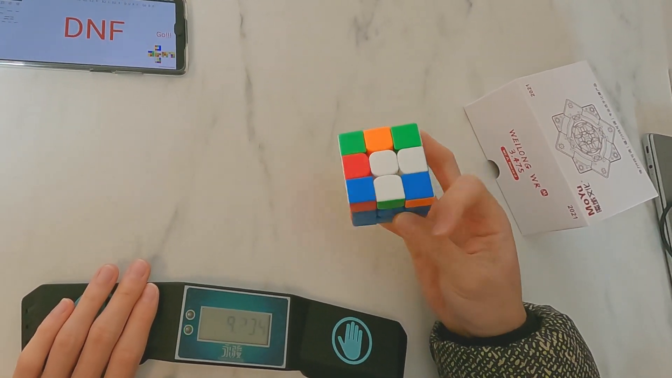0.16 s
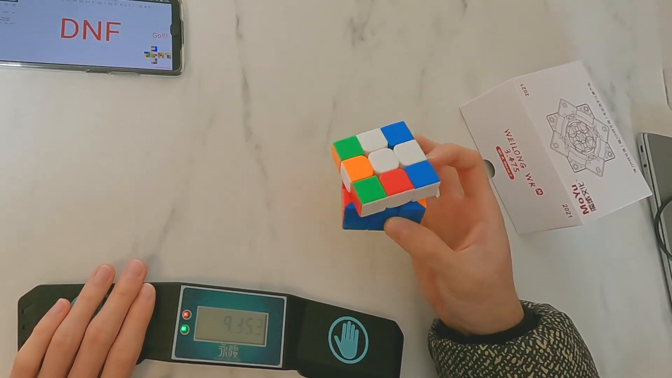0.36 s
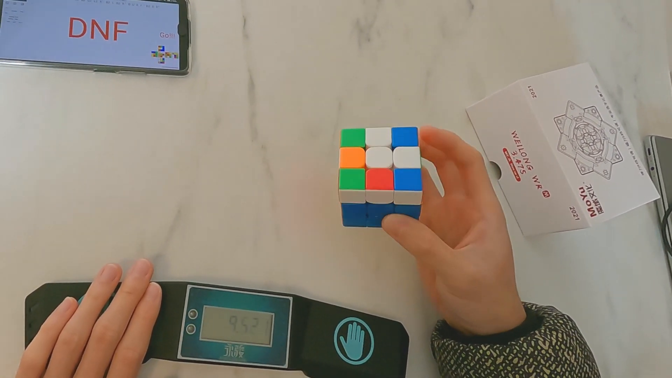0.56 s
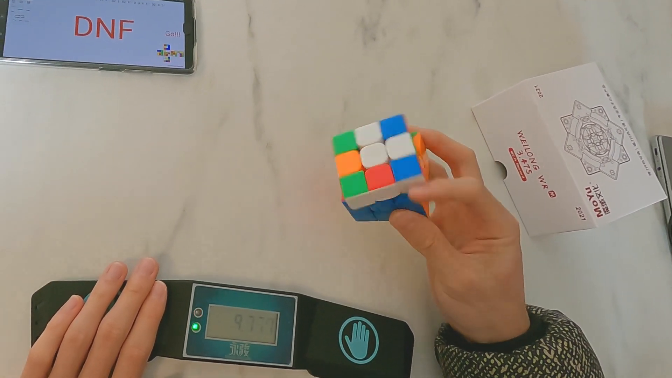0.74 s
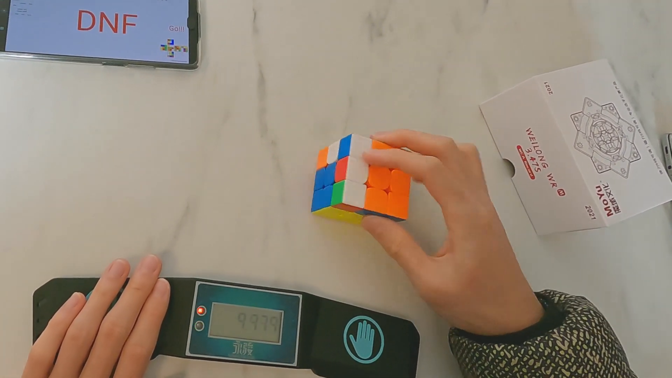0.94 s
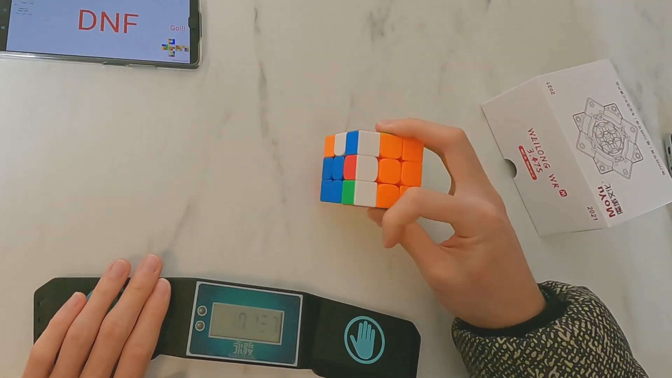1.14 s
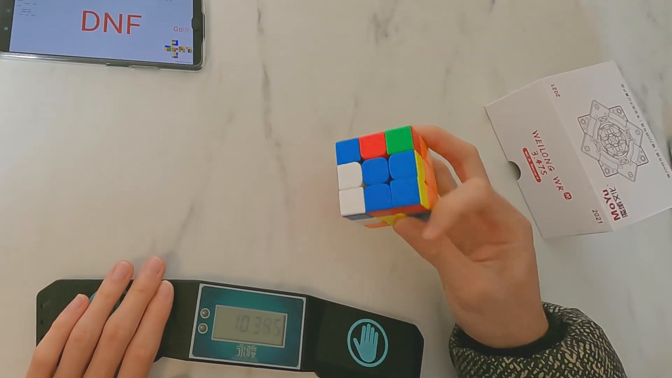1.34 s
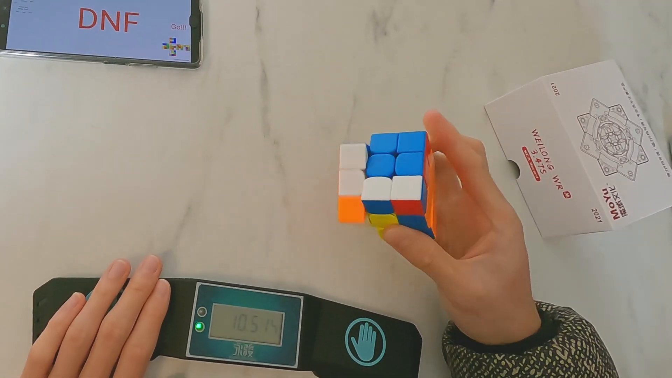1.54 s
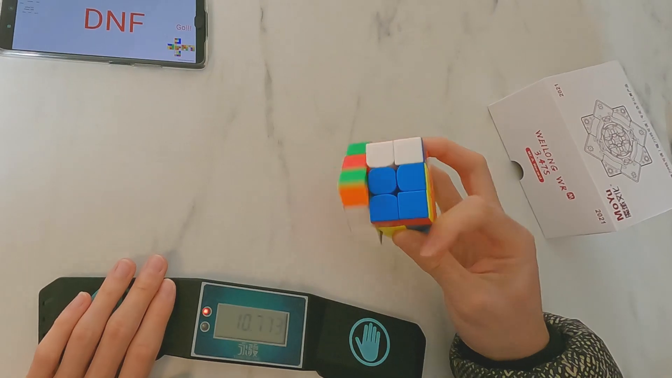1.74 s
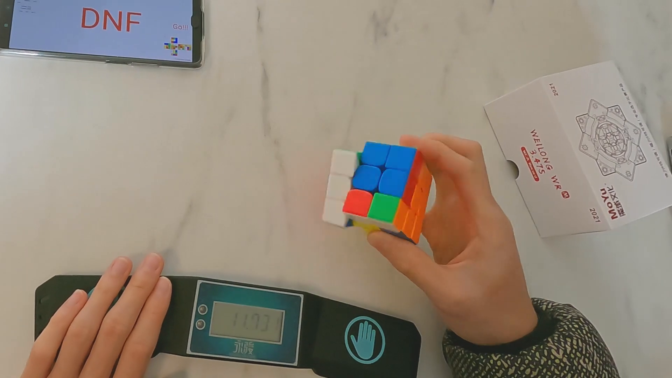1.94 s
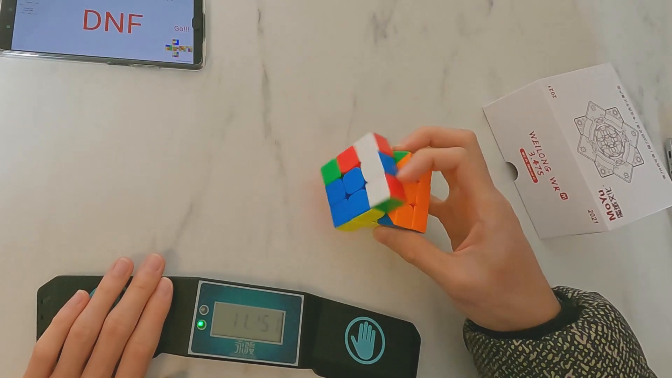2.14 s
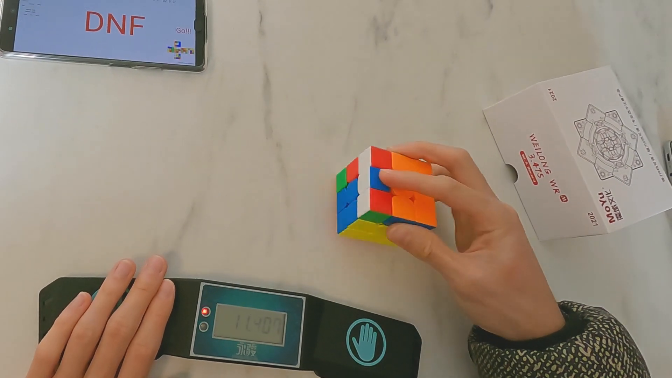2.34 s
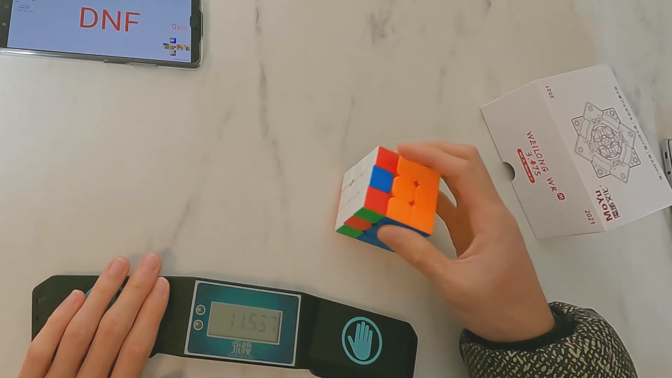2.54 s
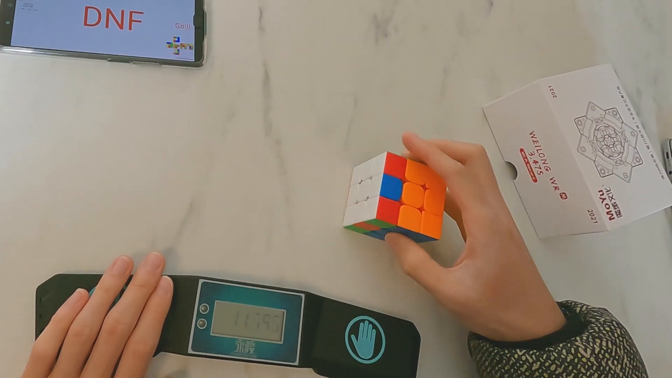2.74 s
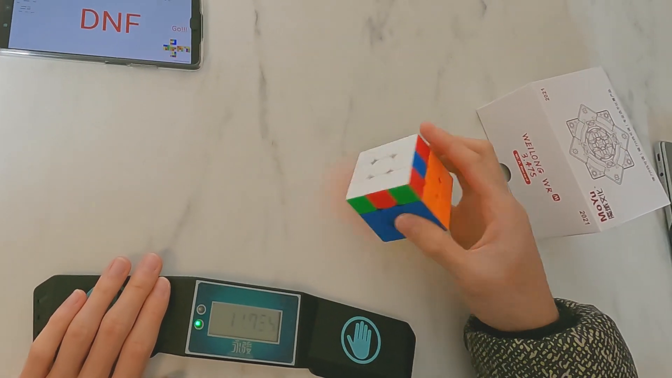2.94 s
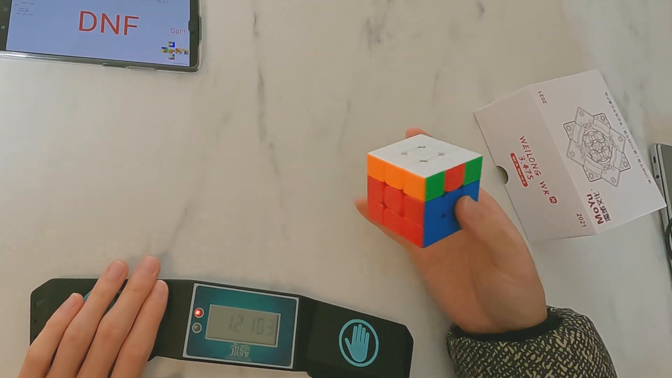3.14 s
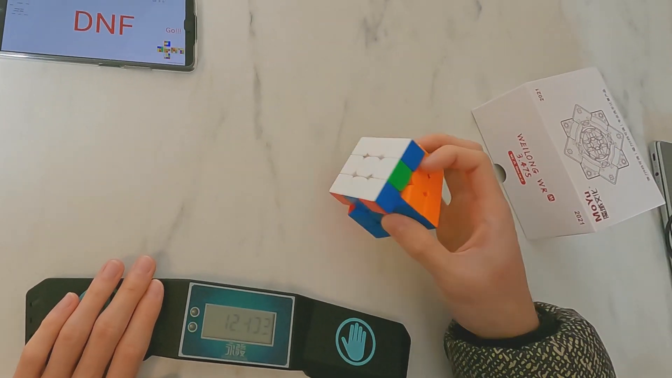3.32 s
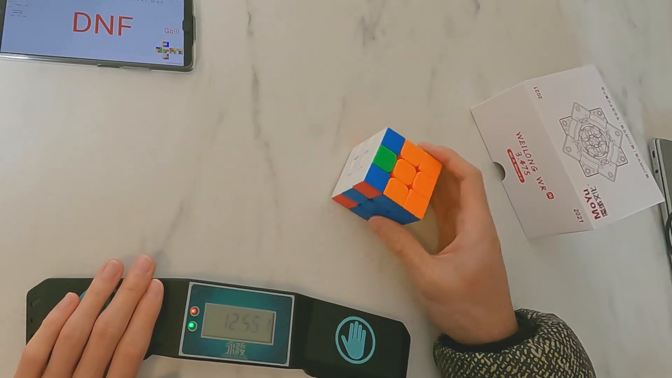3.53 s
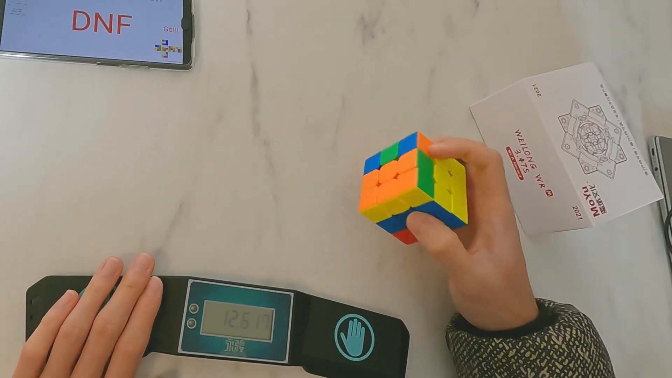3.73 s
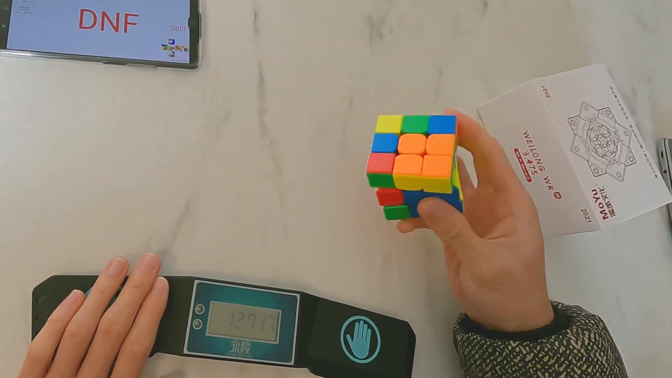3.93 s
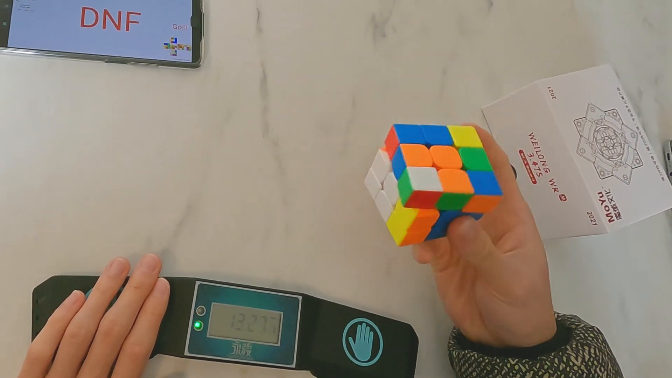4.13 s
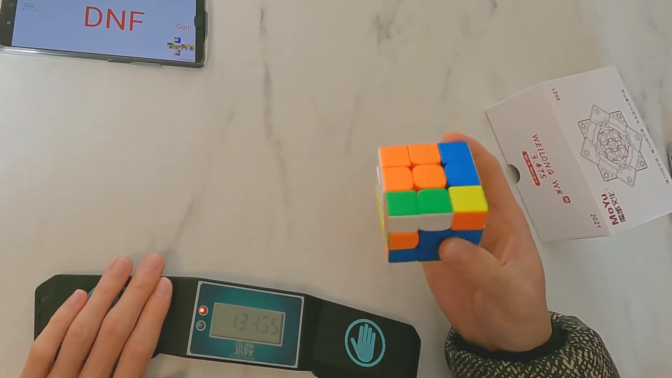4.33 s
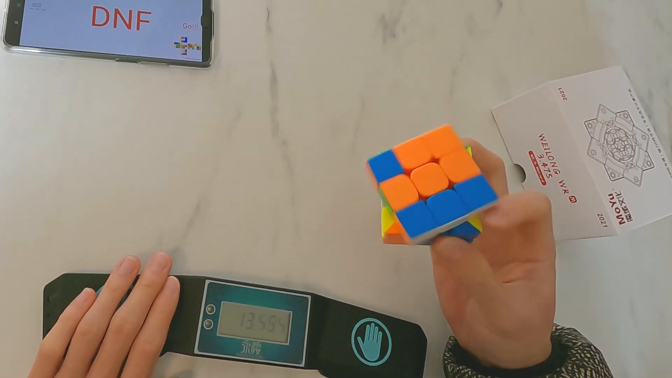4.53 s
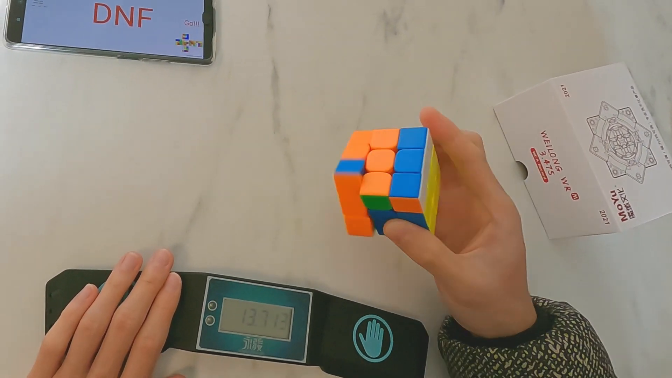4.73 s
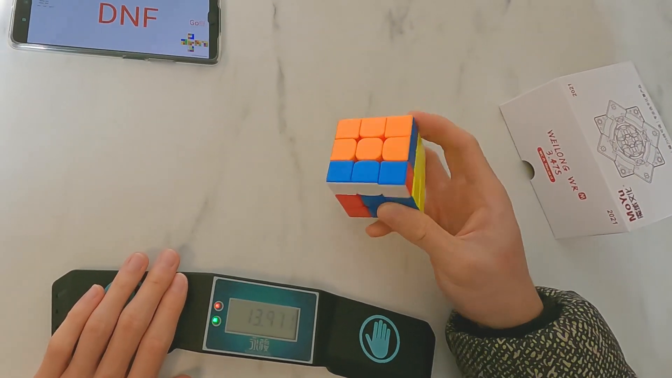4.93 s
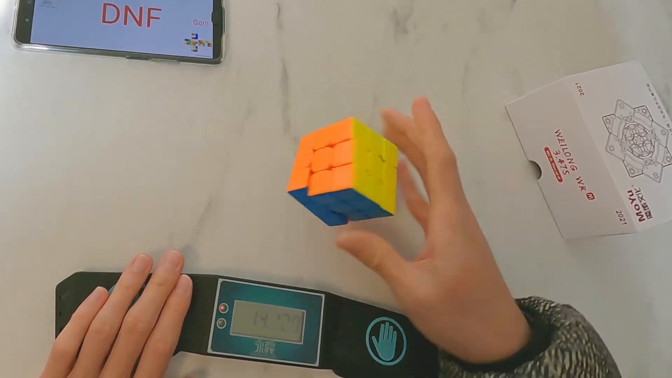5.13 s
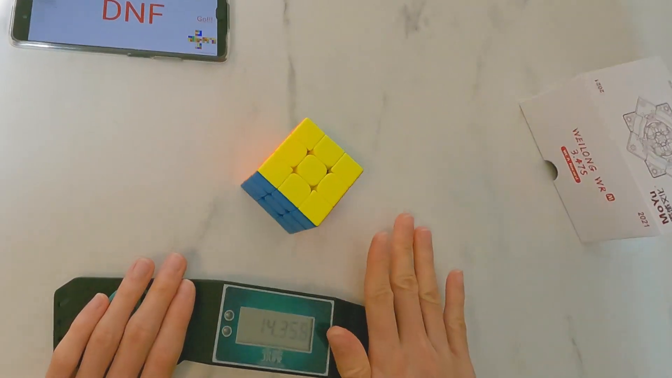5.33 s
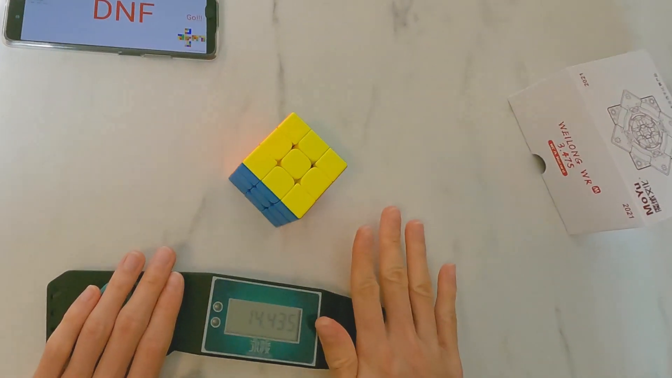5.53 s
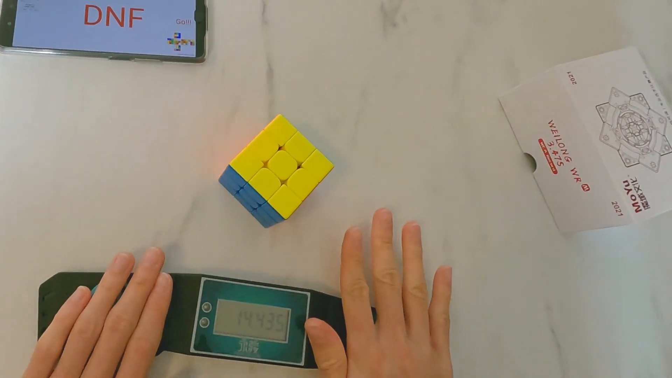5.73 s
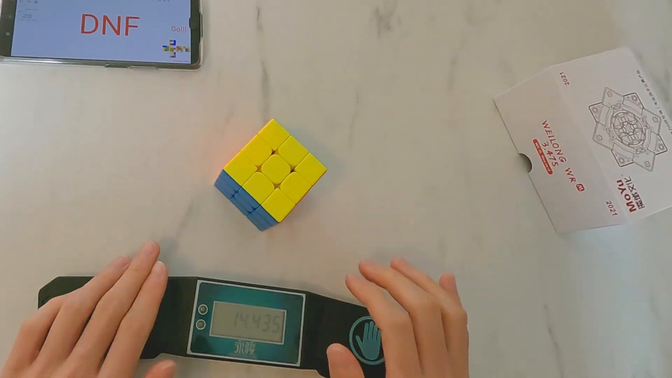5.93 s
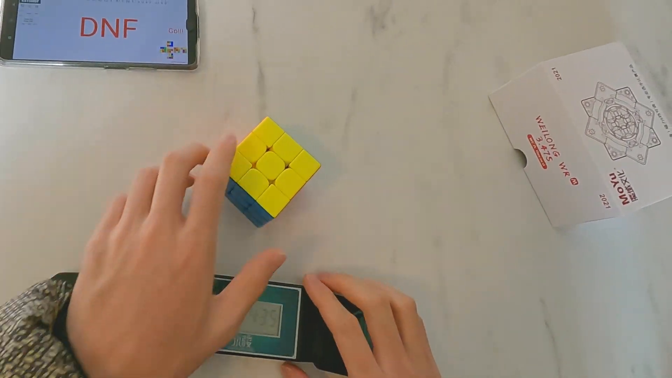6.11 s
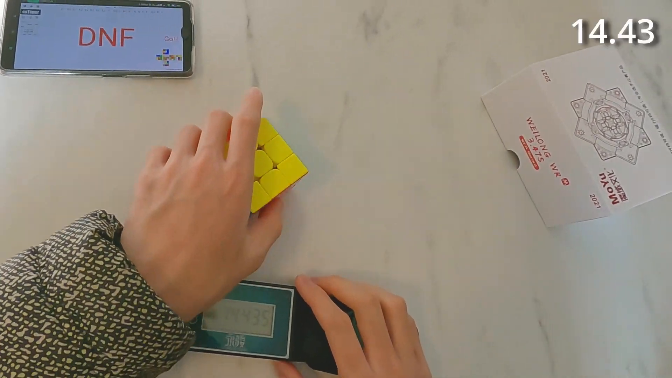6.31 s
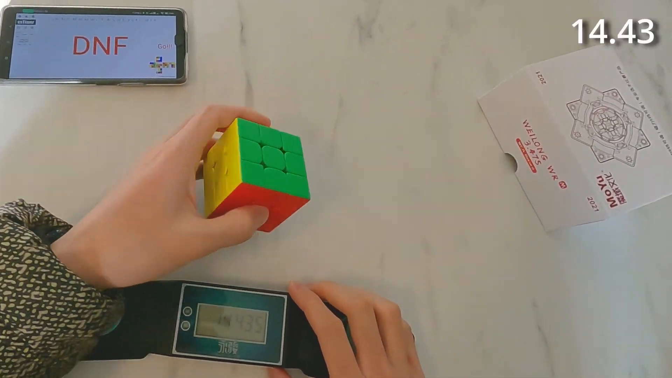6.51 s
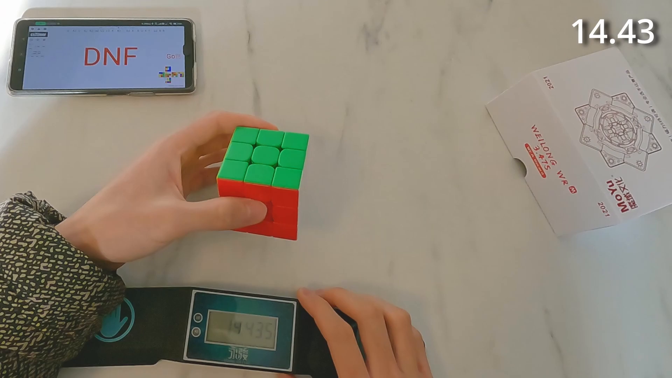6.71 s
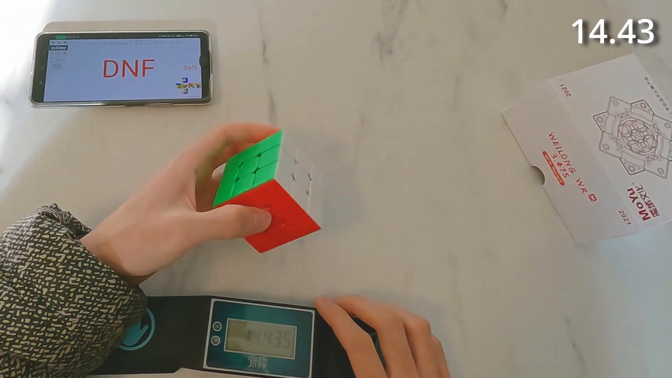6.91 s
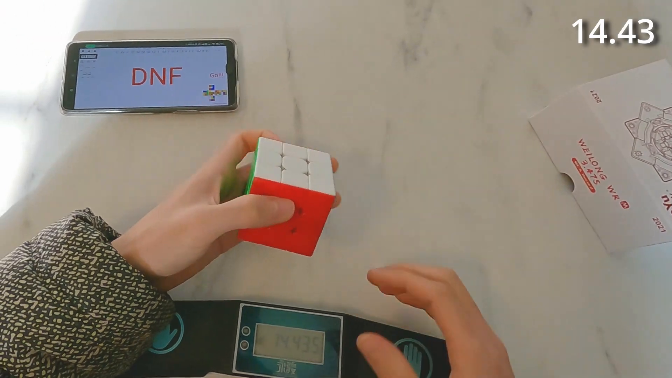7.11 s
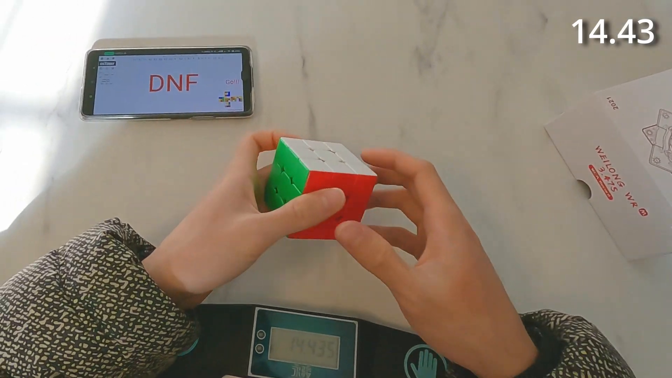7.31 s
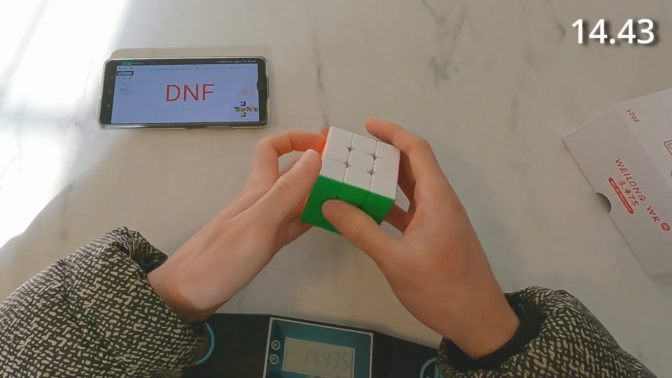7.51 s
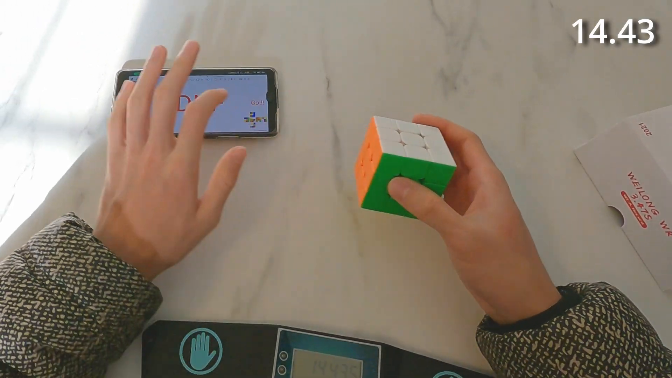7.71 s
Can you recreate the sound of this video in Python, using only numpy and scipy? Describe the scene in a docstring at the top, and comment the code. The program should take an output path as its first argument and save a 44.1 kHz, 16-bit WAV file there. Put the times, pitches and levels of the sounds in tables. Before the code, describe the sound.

Rapid plastic clacking of a puzzle cube turned in one hand, occasional desk knocks, then a drop and slap, followed by quiet rustling.

```python
"""Puzzle cube over a desk

A plastic puzzle cube is turned fast in one hand: sliding grains and clacks excite resonances, and each
contact adds a hollow note. Now and then the cube knocks the desk: decaying desk modes and a slow low ring of
the room. Late on it drops, the hand slaps down and quiet taps follow. Brief rubs are banded hiss; sleeves
rustle as shaped noise over quiet room air. Close stereo microphone, short reverberation.
"""
import sys
import numpy as np
from scipy import signal
from scipy.fft import rfft, irfft, next_fast_len
from scipy.io import wavfile
from scipy.ndimage import map_coordinates

SR = 44100
rng = np.random.default_rng(int(sys.argv[2]) if len(sys.argv) > 2 else 0)


def store_wav(level_fs):
    """Save 16-bit WAV to argv[1]."""
    pcm = np.round(np.clip(np.atleast_2d(level_fs), -1, 1) * 32767)
    wavfile.write(sys.argv[1], SR, pcm.T.astype(np.int16))


N = 346626


def amp(db):
    """dB to gain."""
    return 10 ** (np.asarray(db) / 20)


def unit(x):
    """Scaled to rms 1."""
    return x / np.sqrt(np.mean(x ** 2) + 1e-20)


def along(points, hz):
    """(Hz, value) points interpolated on a log frequency axis."""
    point_hz, value = np.transpose(points)
    return np.interp(np.log(hz + 1), np.log(point_hz + 1), value)


def curve(rows):
    """Gain per sample from (s, dB) rows, -120 dB outside them."""
    s, db = np.transpose(rows)
    return amp(np.interp(np.arange(N) / SR, s, db, -120, -120))


def wobble(knots_per_s):
    """Smooth random curve: a spline through Gaussian knots."""
    knots = rng.standard_normal(int(N * knots_per_s / SR) + 4)
    return map_coordinates(knots, [np.arange(N) * knots_per_s / SR])


def filtered(x, response):
    """x times a complex response of frequency."""
    m = next_fast_len(N + SR // 2)
    return irfft(rfft(x, m) * response(np.fft.rfftfreq(m, 1 / SR)), m)[..., :N]


def through(x, modes):
    """x through causal resonances that radiate little outside their range; white noise keeps its rms."""
    def response(f):
        h = 0
        for k, (hz, width_hz, db) in enumerate(modes):
            damping = 1j * f * width_hz
            h = h + (-1) ** k * amp(db) * damping / (hz * hz - f * f + damping)
        h = h * (1j * f / (1j * f + modes[0][0] / 2)) ** 2  # low cut
        h = h / (1j * f + 2 * modes[-1][0])  # high cut
        return h / np.sqrt(np.mean(np.abs(h) ** 2))
    return filtered(x, response)


# left-right correlation of diffuse sound: (frequency [Hz], correlation [0-1])
LIKENESS = [(60, 0.96), (180, 0.96), (350, 0.92), (600, 0.7), (1000, 0.73), (2500, 0.25), (5500, 0.54),
            (9000, 0.6), (14000, .3)]


def diffuse(pair):
    """Two unrelated signals mixed to the left-right correlation of a diffuse field."""
    def mid_side(hz):
        turn = np.arccos(np.clip(along(LIKENESS, hz), -1, 1)) / 2
        return np.array([np.cos(turn), np.sin(turn)])
    mid, side = filtered(pair, mid_side)
    return np.array([mid + side, mid - side])


def coloured(spectrum, gain):
    """Noise pair with a given gain, shaped to a spectrum, rms 1."""
    noise = gain * rng.standard_normal((2, N))
    return unit(filtered(noise, lambda hz: amp(along(spectrum, hz))))


# air spectrum: (frequency [Hz], relative density [dB per Hz])
AIR_SPECTRUM = [(13, -63), (22, -14), (55, -1), (80, -4.5), (106, -13), (152, 0.5), (211, -4), (337, -9.5),
                (409, -14), (814, -14), (2660, -21.5), (2890, -24), (3920, -25.5), (7810, -34),
                (16000, -57)]
# air level before its random wobble: (time [s], level [dB])
AIR_LEVEL = [(0, -51.5), (5.9, -52.5), (7, -52.5), (7.87, -48.5)]


def room_air():
    """Room air: diffuse shaped noise whose level wanders slowly."""
    return diffuse(curve(AIR_LEVEL) * amp(wobble(2.86)) * coloured(AIR_SPECTRUM, 1))


# layers sliding on each other: (time [s], hold [s], level [dB])
SLIDES = [(0.0, 0.0059, -36), (0.383, .01, -40.5), (0.898, 0.0061, -38.5), (1.2, 0.012, -41),
          (1.347, 1, -45), (2.244, .01, -50), (2.731, 0.066, -33.5), (3.561, 0.063, -32),
          (4.103, 0.093, -43), (4.997, 0.092, -40.5), (5.35, 0.13, -36.5)]
SLIDE_RISE_DB_PER_S, SLIDE_FALL_DB_PER_S = 455, 149


def sliding():
    """Strength of the sliding: each slide swells fast, holds and fades."""
    t = np.arange(N) / SR
    strength = np.zeros(N)
    for s, hold_s, db in SLIDES:
        rise_db = SLIDE_RISE_DB_PER_S * np.clip(s - t, 0, None)
        fall_db = SLIDE_FALL_DB_PER_S * np.clip(t - s - hold_s, 0, None)
        strength += amp(db - rise_db - fall_db)
    return strength


def swell(rise_s):
    """Strength of a contact: it peaks at 1 after the rise time, then dies away."""
    u = np.arange(SR // 32) / SR / max(rise_s, .0002)
    return u * np.exp(1 - u)


def touches(shape):
    """Chatter of tiny touches inside a contact, with the energy of the smooth shape."""
    n = shape.shape[1]
    spikes = amp(4.1 * np.repeat(rng.standard_normal(n // 20 + 1), 20)[:n])
    rough = shape * spikes * rng.standard_normal(shape.shape)
    energy_match = np.linalg.norm(shape, axis=1, keepdims=True) / np.linalg.norm(rough, axis=1, keepdims=True)
    return rough * energy_match


# clacks of cube pieces, and late on quiet taps of hand and cube on the desk:
# (peak time [s], tick [dB], hollow part [dB re tick], edge [dB re tick], rise [ms])
CLACKS = [(0.0762, -34, -0.5, -2, 1.9), (0.0861, -30, -4.0, -5, 2.17), (0.093, -32, 0.5, -4, 1.93),
          (0.1009, -23.5, -4.0, 1, 1.15), (0.1284, -25, -6, -6, 1.15), (0.1332, -24, -3, -6, 1.4),
          (0.141, -36, -1, 1, 2.26), (0.1526, -32, -9.0, -6, 0.9), (0.1789, -27.5, 0, -3.5, 1.84),
          (0.355, -40, -20, -8, 0.76), (0.3909, -21, -18, -10.0, 1.04), (0.4012, -20.5, 0.5, -4, 1.51),
          (0.4187, -39.5, 6.5, -4.0, 1.94), (0.5427, -36.5, -19, -13, 0.83), (0.8068, -47.5, -4, -3, 1.1),
          (0.823, -44, -5, -6, 0.7), (0.8618, -40.5, -12.0, -16.0, 1.2), (0.896, -40.5, 0, -5, 2.2),
          (0.9165, -27.5, 0.5, -3.5, 1.6), (0.931, -35.5, -4, 0.5, 2), (0.983, -40.5, -7, -13, 1.56),
          (0.9886, -39, 8.5, -7, 1.14), (1.0092, -26.5, 0, -4.5, 1.23), (1.039, -42.5, -3, -2, 1.9),
          (1.0817, -42, -8, -15, 0.6), (1.1018, -27.5, 4.5, 6, 2.2), (1.1068, -20, 1, -6, 1.3),
          (1.2532, -30, 5.5, -2, 1.26), (1.3423, -41, -5, -15, 0.6), (1.3649, -29, 0, -4.0, 0.95),
          (1.3723, -18.5, -9, -7, 1.18), (1.3846, -18.5, -2, -3, 1.22), (1.3893, -20, -3.5, -4, 0.45),
          (1.4159, -16, -5, -10.0, 1.72), (1.5702, -37, -8, -6.0, 2), (1.58, -31.5, -2, -3, 2.1),
          (1.5923, -25.5, -9, -4.5, 1.73), (1.6072, -34.0, -6, -4, 2.3), (1.6454, -44, 5, -7.0, 1.6),
          (1.6602, -28.5, -6, -3.5, 2.0), (1.6839, -28.5, -1.0, -7, 0.93), (1.75, -43, 6, -11.0, 2.1),
          (1.761, -20.5, -16.5, -11, 0.69), (1.7809, -17, -7.5, -9.5, 1.92), (1.7972, -31.5, -5, 0.5, 2.4),
          (1.8853, -34.0, 3, -2, 1.67), (1.8985, -16.5, -7, -4.0, 1.1), (1.9082, -42, -1.0, 4, 2.2),
          (1.9682, -31.0, -7.5, -10.0, 2.06), (1.9761, -34.5, 1, -5.0, 2.13), (1.983, -34, -1.5, -4, 1.46),
          (2.0004, -32.5, -3, -11.0, 1.9), (2.012, -37.5, -5.0, -7.0, 2.4), (2.0349, -42, -6, -1.0, 1.1),
          (2.0516, -47.5, 13, 1.0, 0.82), (2.061, -34, -4, -13, 1.5), (2.0832, -32.5, -1, -1.0, 1.7),
          (2.1026, -45, 7, -2.0, 1.6), (2.1149, -25, -7.0, -2, 1.5), (2.1258, -16.5, -7.5, -4, 2.2),
          (2.153, -29.5, -0.5, -3, 2.3), (2.19, -30.5, -18, -15, 1.16), (2.2463, -34, -22, -20, 1.1),
          (2.2746, -22.5, -5.5, -5.5, 1.95), (2.2888, -21.5, -14, -2, 0.97),
          (2.2932, -24.5, 2.0, 2.5, 1.28), (2.3055, -29.5, -11, -9, 1.55), (2.3142, -24.0, -12, -18, 1.58),
          (2.3595, -38.5, -8, -9.0, 1.9), (2.435, -23, -9, -1.5, 0.81), (2.4995, -35.5, -3, -15, 0.9),
          (2.541, -35, -2, -12, 1.9), (2.549, -41, -4, -3.0, 2.2), (2.5717, -28.5, 4.5, -4, 1.04),
          (2.5928, -43, 8, -2, 0.8), (2.612, -28, -6.0, -8, 1.2), (2.7085, -17, -5.5, -3.5, 2.6),
          (2.975, -68, 10, 21, 1.7), (3.204, -50, -14, -3, 0.85), (3.328, -49.5, -17, -3, 0.6),
          (3.3487, -35, -9, -6, 1.14), (3.366, -27.5, -6.5, -3.5, 2.3), (3.3731, -30.0, -0.5, -2, 2.2),
          (3.3824, -18, -4.5, -4.5, 1.17), (3.5228, -21, 2.5, -3.0, 2.1), (3.54, -17.5, -4, 1.5, 0.8),
          (3.5438, -19.5, 3, -6.0, 1.25), (3.5484, -26, 3.5, -1, 2.37), (3.7004, -38, 6, -6, 0.99),
          (3.7081, -30.5, -4, -6, 1.28), (3.7205, -30, 0.5, -1.5, 2.5), (3.7443, -33.5, -5, -0.5, 2.26),
          (3.7539, -40, 3, -3, 0.98), (3.815, -44, -18, -16, 1.7), (3.962, -41, -10, -9, 0.6),
          (3.9696, -39, 10.5, -8, 0.96), (3.9826, -43, 6, 0.0, 2.3), (3.9978, -35.5, 4, 5, 2),
          (4.0136, -36, 0, -10, 1.14), (4.026, -36.5, -15, -2, 1.2), (4.0337, -48.5, 6, -4, 2.14),
          (4.0918, -31.5, -5, -8, 1.34), (4.0972, -29, -9.0, -7, 1.3), (4.1099, -22.0, -4, -3, 1.15),
          (4.126, -33, -6, -2, 2.2), (4.1395, -22.5, -18.0, -9, 0.83), (4.1569, -36.5, 11.5, 5, 0.42),
          (4.1622, -29.5, -2.5, -4, 1.27), (4.1723, -29.5, -1, -2.5, 2.2), (4.255, -39.5, -10, -12, 0.77),
          (4.277, -38, -10, -9, 0.59), (4.289, -46.0, 8, 0, 1.05), (4.2973, -37.5, -5, -3, 2.5),
          (4.3122, -28.5, -7, -1.0, 1.87), (4.3267, -35.5, 3.5, -12, 0.57), (4.368, -25, -8.0, -7, 1.73),
          (4.3752, -25, -5, -6, 1.6), (4.3851, -36, -3, -2, 1.73), (4.3903, -32, -1, -8, 1.17),
          (4.5021, -36.5, -1, -3, 2), (4.508, -24.5, -4.5, -13, 1.7), (4.5214, -31.5, -1.5, 0.5, 1.67),
          (4.5519, -21.5, -3.5, -7, 1.96), (4.5636, -24.5, -16, -2.5, 2.2), (4.573, -31.5, 4.0, -2, 0.9),
          (4.586, -33.5, -23, -12, 1.1), (4.6147, -35, -17, -14, 0.43), (4.672, -36.5, 1, -7, 1.1),
          (4.6868, -34.5, -1, -8, 1.75), (4.6969, -26, -11, -13, 0.74), (4.701, -25.5, -3.0, -1.5, 0.79),
          (4.7165, -38.0, -2.0, -7, 1.2), (4.7318, -33, -10, -9, 1.5), (4.8558, -44, -12, -10, 0.9),
          (4.8852, -32.5, 0, -15, 0.7), (4.8888, -33.5, 3, 1.0, 1.9), (4.9062, -25.5, -1.0, 1.5, 1.17),
          (4.944, -21, -4, -3.5, 1.03), (4.96, -23.5, -3, -3.5, 2.13), (4.987, -33.5, -3, 0, 1.94),
          (5.023, -41, -12, -7.5, 1.3), (5.0334, -22.5, -7, -6.5, 1.6), (5.102, -34, 1, -19, 0.9),
          (5.107, -29, -4, -8.0, 0.82), (5.1267, -30.5, -3.0, 4.5, 1.4), (5.1441, -32.5, -2.0, -5.0, 1.5),
          (5.1552, -24.0, -5, -12, 0.93), (5.174, -35, 1.5, -6, 2.7), (5.1921, -21.5, -6.5, -5, 0.72),
          (5.2793, -15, -5.0, -11, 1.2), (5.2842, -17.5, -8, -9, 0.83), (5.3088, -24, -8.5, 1, 2.16),
          (5.3197, -17, -12, -1.5, 2.76), (5.3669, -29.5, 6, -8, 2.2), (5.4011, -24.5, 7.5, 8.5, 2.2),
          (5.69, -59, 23.5, 19, 1.14), (6.015, -56, 8, 18.5, 0.93), (6.0237, -61, 17, 9, 0.79),
          (6.0472, -65, 18, 6, 1.4), (6.1035, -53, 19, 11, 1.73), (6.1115, -60, 17, 2, 0.66),
          (6.4464, -70, 0, 14, 0.46), (6.4602, -65.5, 8, 21, 1.4), (6.9915, -52.5, -10, -15, 0.7),
          (7.155, -60, 10, -3, 1), (7.172, -55, 5, -3, 1.2), (7.1853, -53, 16.5, 4, 2.17),
          (7.6405, -45.5, -2, -14, 0.95), (7.655, -53.5, 8, 0, 1.2), (7.8547, -62, 17, 8, 0.71)]
# faint loose tick after each contact: delay is half-normal, level re contact
STRAY_DELAY_SCALE_S, STRAY_DB, STRAY_SCATTER_DB, STRAY_RISE_MS = 0.037, -22, 5, 0.93
NOTE_HZ, NOTE_LOG_SPREAD = 1383, 0.255  # middle pitch of the hollow notes


def contacts():
    """Clacks, late taps and their stray ticks: rows (s, tick dB, hollow dB, edge dB, rise s, note Hz)."""
    s, db, hollow_re_db, edge_re_db, rise_ms = np.transpose(CLACKS)
    luck = rng.standard_normal((4, len(s)))
    s = np.append(s, s + STRAY_DELAY_SCALE_S * np.abs(luck[0]))
    db = np.append(db, db + STRAY_DB + STRAY_SCATTER_DB * luck[1])
    hollow_db = db + np.tile(hollow_re_db, 2)
    edge_db = db + np.tile(edge_re_db, 2)
    rise_s = np.append(rise_ms, np.full(len(rise_ms), STRAY_RISE_MS)) / 1000
    note_hz = NOTE_HZ * np.exp(NOTE_LOG_SPREAD * luck[2:].ravel())
    return zip(s, db, hollow_db, edge_db, rise_s, note_hz)


# contact resonances: (frequency [Hz], width [Hz], relative level [dB])
TICK_MODES = [(5020, 740, 11.5), (7060, 1130, 13), (8020, 56, -21.5), (8600, 500, -23), (12960, 530, -20)]
HOLLOW_MODES = [(1012, 490, -0.6), (1360, 253, 2), (1720, 400, -3)]
EDGE_MODES = [(2140, 1020, 0.1), (3800, 1470, 0.62), (4610, 830, -1.7)]
NOTE_DB = -8  # re hollow part
SCRAPE_DB, SCRAPE_S = -17, .003  # scrape before a contact: level re contact, growth time
JOLT_S = .007  # contacts this near a blow on the desk come without warning


def cube():
    """Contacts and sliding grains ring the same resonances; each contact adds its own hollow note."""
    force, notes = np.zeros((3, N + SR)), np.zeros(N + SR)
    t = np.arange(SR // 64) / SR
    for s, db, hollow_db, edge_db, rise_s, note_hz in contacts():
        at = round((s - rise_s) * SR)
        levels = amp([[db], [hollow_db], [edge_db]])
        force[:, at:at + SR // 32] += levels * touches(np.tile(swell(rise_s), (3, 1)))
        # a scrape of growing pressure leads into the contact
        if all(abs(s - blow[0]) > JOLT_S for blow in BLOWS):
            pressure = amp(SCRAPE_DB) * np.exp(-t[::-1] / SCRAPE_S)
            force[:, at - len(t):at] += levels * pressure * rng.standard_normal((3, len(t)))
        tone = np.sin(2 * np.pi * (note_hz * t + rng.random()))
        notes[at:at + len(t)] += amp(hollow_db + NOTE_DB) * swell(rise_s)[:len(t)] * tone
    # sliding: dense grains in clumps, shared over tick, hollow, edge
    clumps = unit(amp(1.74 * wobble(300) + 5.0 * wobble(55)))
    grains = clumps * rng.standard_normal((3, N))
    tick, hollow, edge = force[:, :N] + sliding() * amp([[-6], [-9], [-11]]) * grains
    return through(tick, TICK_MODES) + through(hollow, HOLLOW_MODES) + through(edge, EDGE_MODES) + notes[:N]


# short reverberation: (frequency [Hz], t60 [s])
ROOM_T60 = [(200, 0.58), (1000, 0.57), (3500, 0.55), (9000, 0.3), (14000, 0.46)]


def room(x):
    """Reverberation: each frequency dies at its own speed; each short stretch gets a new noise tail."""
    wet, size = np.zeros((2, N + SR)), SR // 6
    predelay = 250  # samples
    for at in range(0, N, size):
        hz, t, z = signal.stft(rng.standard_normal((2, SR // 2)), SR, nperseg=256)
        decay = amp(-60 * t / along(ROOM_T60, hz)[:, None])
        tail = signal.istft(z * decay, SR, nperseg=256)[1]
        part = signal.fftconvolve(x[None, at:at + size], tail / np.linalg.norm(tail[0]), axes=1)
        start = at + predelay
        wet[:, start:start + part.shape[1]] += part
    return diffuse(wet[:, :N])


def ring(modes, rise_s, scatter_db):
    """Decaying modes excited once, each at a new strength."""
    t = np.arange(SR) / SR
    tones = np.zeros(SR)
    for hz, db, t60_s in modes:
        decay = amp(db + rng.normal(0, scatter_db) - 60 * t / t60_s)
        tones += decay * np.sin(2 * np.pi * hz * t)
    return (1 - np.exp(-t / rise_s)) * tones


# blows on the desk:
# (time [s], panel [dB], long sway [dB re panel], boom [dB re panel], rap [dB re panel])
BLOWS = [(1.104, -21.5, -9.5, -13, 11), (2.431, -26.5, -13, -22, -2.5), (2.53, -40, -27, 0, 4),
         (2.705, -21.5, -9.5, -12, 4.5), (2.97, -37.5, -19, -4, -0.5), (3.523, -25, -22, -23, -14),
         (3.543, -20.5, -16, -7, 5), (5.277, -20.5, -16, -6, -2), (5.308, -20.5, -9, -11, 6.5),
         (5.318, -26.5, -9.5, -23, 0), (5.402, -30.5, 2.5, 14.5, 1), (5.429, -38, 2.5, 19, -5),
         (6.008, -60.5, -2, -14, 4), (6.10, -37, -10.5, 3, 8.5)]
# desk top modes; the sway's 129 Hz is a slow low ring of the room:
# (frequency [Hz], relative level [dB], t60 [s])
PANEL_MODES = [(171, 1, 0.04), (212.2, -1, 0.21), (243.2, -0.5, 0.14), (269.7, -1, 0.15), (315.4, 2, 0.13),
               (347, -2, 0.076), (401, -12.5, .15), (432, -19, 0.26), (489, -14.5, 0.34),
               (624, -10.5, 0.07)]
BOOM_MODES = [(70.7, -8.5, 0.24), (83.3, 5, 0.089), (101.3, 1.5, 0.29)]
SWAY_MODES = [(33.1, -1, 1.19), (129.14, 5, 0.78)]
# rap resonances: (frequency [Hz], width [Hz], relative level [dB])
RAP_MODES = [(553, 400, -3.5), (675, 212, 3.5), (1055, 750, -6), (1470, 265, -4)]


def desk():
    """Blows ring the desk top and, low and slow, the room; where and how softly they hit shares out the modes."""
    panel, deep, rap = np.zeros((3, N + SR))
    for s, db, sway_db, boom_db, rap_db in BLOWS:
        at = round(s * SR)
        panel[at:at + SR] += amp(db) * ring(PANEL_MODES, 0.0014, 1.95)
        deep[at:at + SR] += amp(db + boom_db) * ring(BOOM_MODES, 0.0038, 2.7)
        deep[at:at + SR] += amp(db + sway_db) * ring(SWAY_MODES, 0.005, 1.5)
        rap[at:at + SR // 32] += amp(db + rap_db) * touches(swell(0.0016)[None])[0]
    return panel[:N], deep[:N], through(rap[:N], RAP_MODES)


# brief drags over desk and plastic:
# (time [s], length [s], centre [Hz], width [Hz], level before envelope [dB])
RUBS = [(1.126, 0.28, 920, 696, -40.5), (1.13, 0.22, 1610, 500, -34.5), (1.126, 0.2, 3300, 1484, -39),
        (5.416, 0.22, 4500, 910, -40), (5.998, 0.13, 4260, 350, -58), (6.446, 0.089, 2160, 400, -51),
        (6.451, 0.04, 3400, 400, -55), (6.774, .015, 6440, 2500, -60), (7.001, 0.087, 2920, 400, -63),
        (7.417, 0.071, 3500, 2000, -57), (7.805, 0.14, 2020, 500, -53)]


def rubs():
    """Cube and fingers drag briefly: hiss in a steep band, quick to start and slow to fade."""
    out = np.zeros(N + SR)
    for s, length_s, hz, width_hz, db in RUBS:
        t = np.arange(round(length_s * SR)) / SR
        edges_hz = [hz - width_hz / 2, hz + width_hz / 2]
        band = signal.butter(2, edges_hz, "bandpass", fs=SR, output="sos")
        hiss = unit(signal.sosfilt(band, rng.standard_normal(len(t))))
        envelope = np.interp(t, [0, .008, length_s], [0, 1, 0])
        at = round(s * SR)
        out[at:at + len(t)] += amp(db) * envelope * hiss
    return out[:N]


# sleeves and skin moving: (time [s], rustle level [dB])
RUSTLE = [(5.92, -84), (6.05, -75.5), (6.17, -56), (6.33, -60.5), (6.7, -55.5), (6.97, -67), (7.45, -60.5),
          (7.7, -56.5), (7.87, -50.5)]
# spectra of rustle and bright swish: (frequency [Hz], relative density [dB per Hz])
RUSTLE_SPECTRUM = [(500, -12), (1200, 7), (2500, -2), (4500, -2), (7000, -18.5), (12000, -47)]
SWISH_SPECTRUM = [(2000, -23.5), (5000, 0), (7000, 6), (10000, -8.5), (14000, -14), (16000, -12)]
SWISH_DB = -10  # re rustle


def cloth():
    """Sleeves and skin: flickering diffuse noise, a rustle plus a brighter swish."""
    rustle = coloured(RUSTLE_SPECTRUM, amp(2.1 * wobble(40)))
    swish = coloured(SWISH_SPECTRUM, amp(2.2 * wobble(40)))
    return diffuse(curve(RUSTLE) * (rustle + amp(SWISH_DB) * swish))


def ports(hz):
    """Direct path and desk-top bounce, each reaching the two ports a little differently."""
    side = np.array([[-1], [1]])  # left, right
    direct = amp(0.74 * side) * np.exp(1j * np.pi * hz * .000012 * side)
    bounce_delay_s = 0.000587 + .00006 * side
    return direct + amp(-17.0) * np.exp(-2j * np.pi * hz * bounce_delay_s)


def scene():
    """The cube sits a little to the right; the panel and the deep ring reach both ports alike."""
    panel, deep, rap = desk()
    hits = cube() + rubs()
    close = filtered(hits + rap, ports) + panel + deep
    reverb = room(amp(-7.0) * hits + amp(-2.5) * rap + amp(-3.0) * panel)
    return close + reverb + room_air() + cloth()


# microphone response: (frequency [Hz], gain [dB])
MICROPHONE = [(11000, 0), (13000, 0.5), (15000, -17), (16000, -13)]
CEILING, KNEE = .62, 4  # soft overload: full-scale limit, sharpness
TOP_HZ = 16000


def record(dry):
    """The microphone loses top treble; the recorder rounds the peaks, then cuts all above its band limit."""
    heard = filtered(dry, lambda hz: amp(along(MICROPHONE, hz)))
    rounded = heard / (1 + np.abs(heard / CEILING) ** KNEE) ** (1 / KNEE)
    return filtered(rounded, lambda hz: hz < TOP_HZ)


dry = scene()
out = record(dry)
store_wav(out)
```